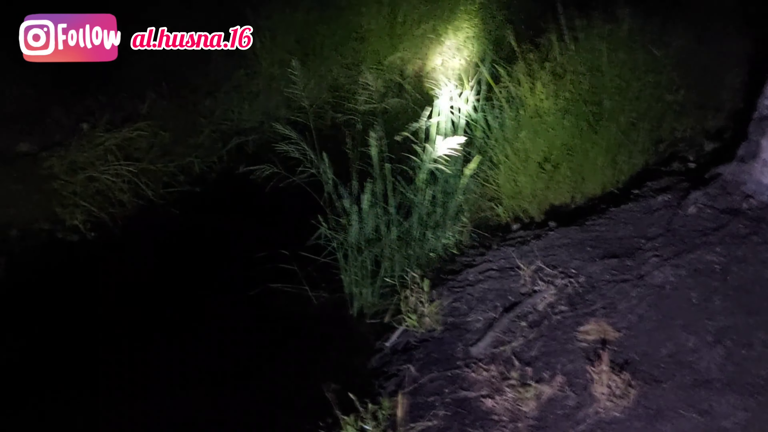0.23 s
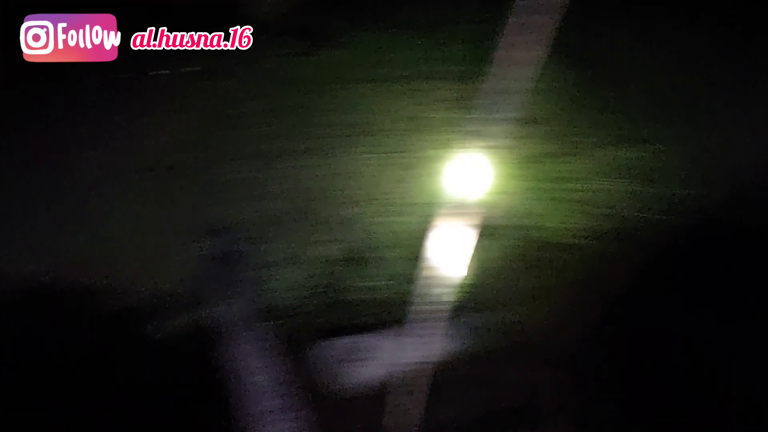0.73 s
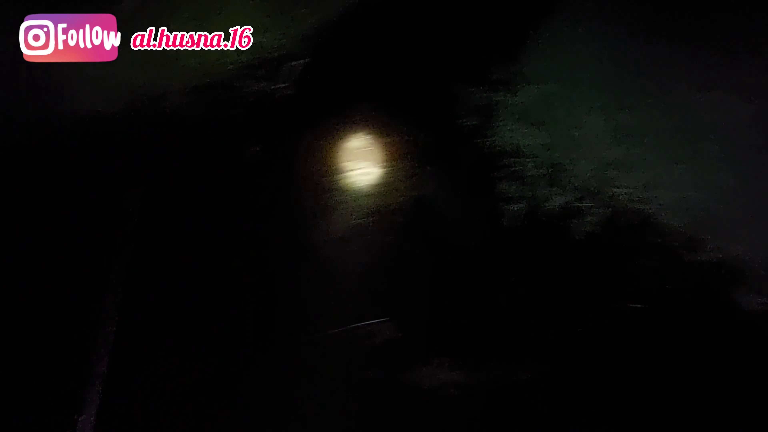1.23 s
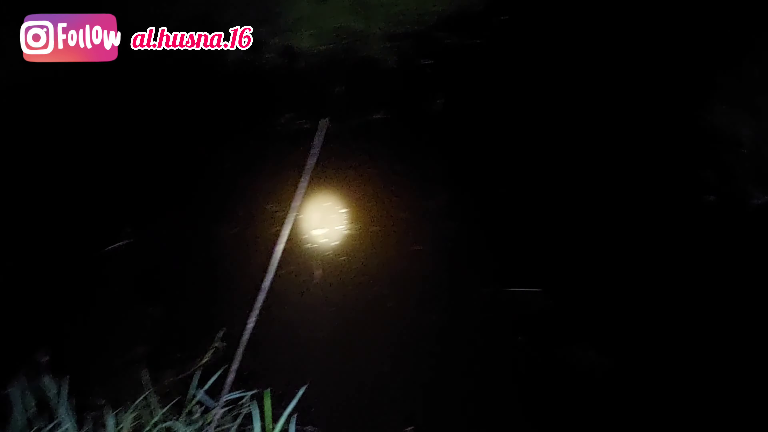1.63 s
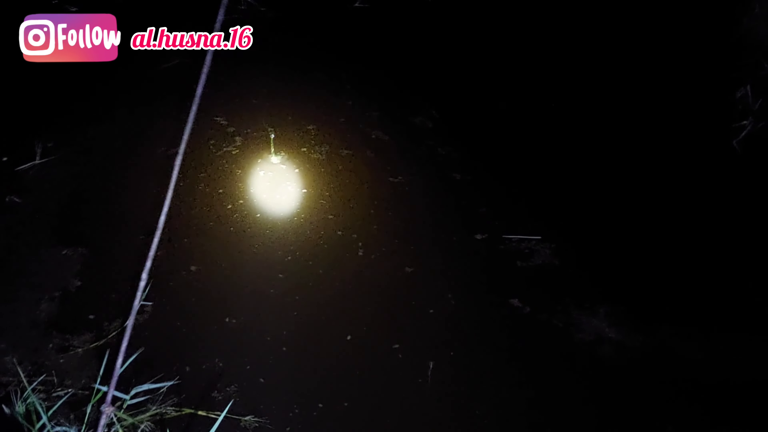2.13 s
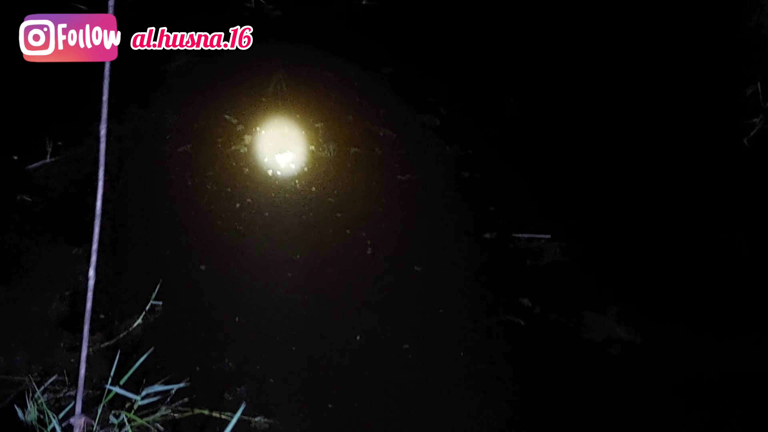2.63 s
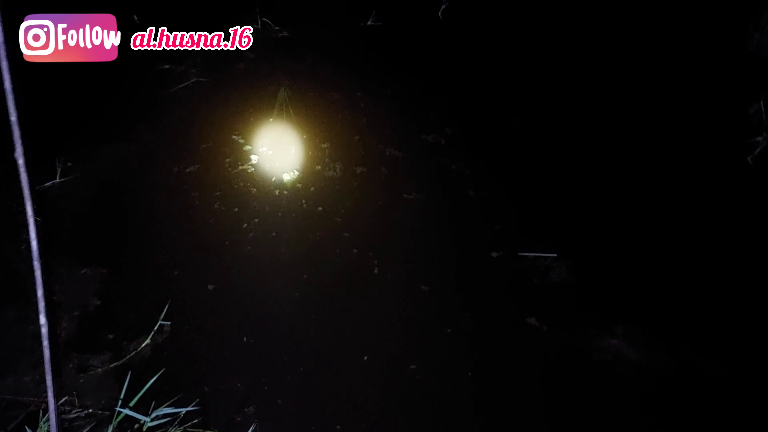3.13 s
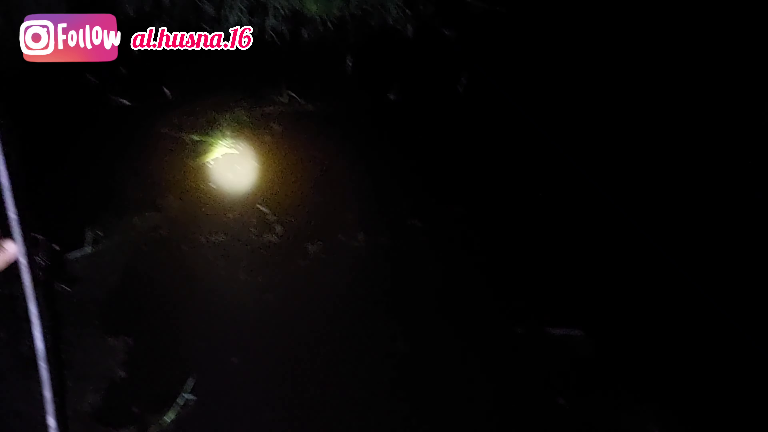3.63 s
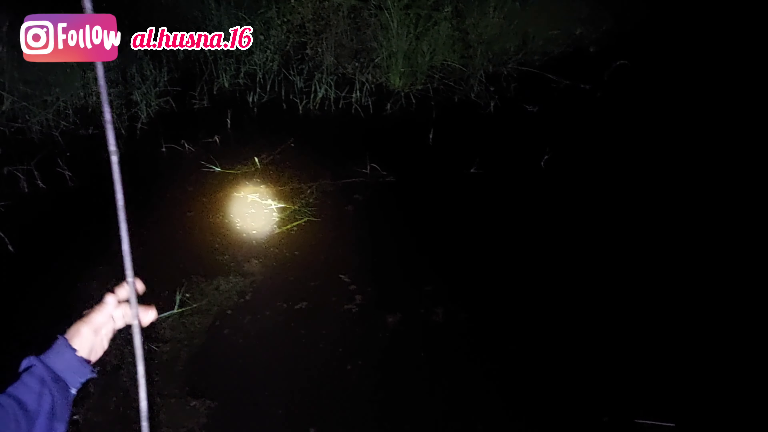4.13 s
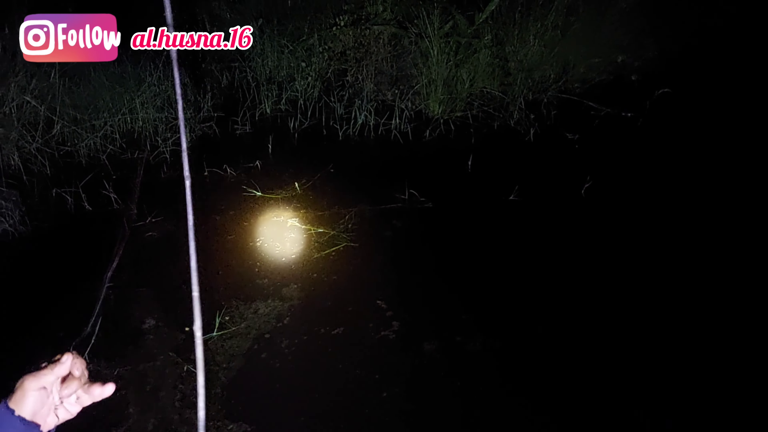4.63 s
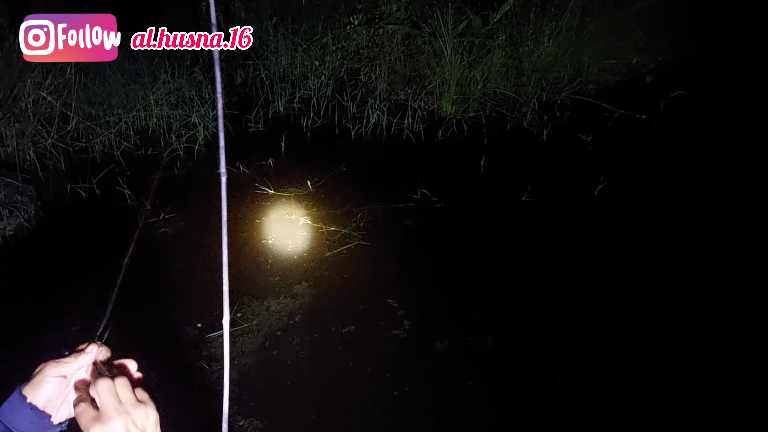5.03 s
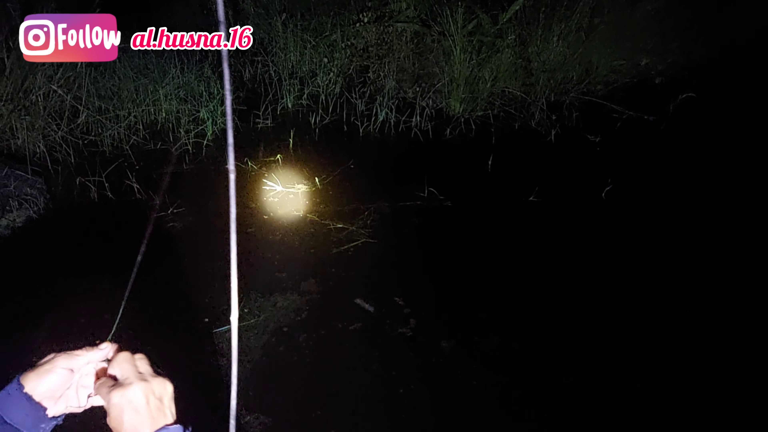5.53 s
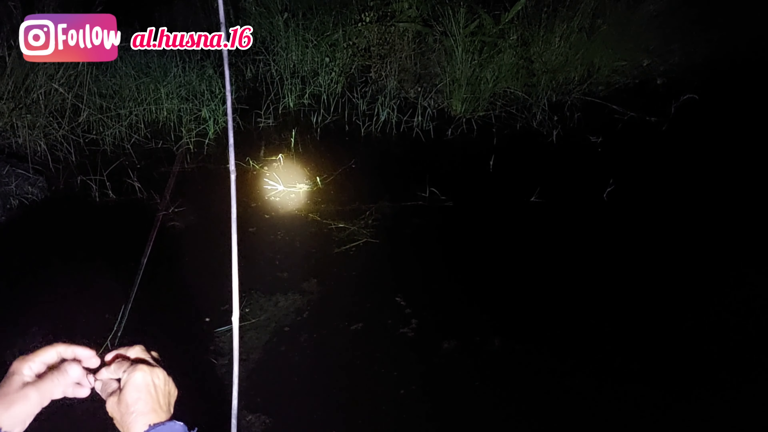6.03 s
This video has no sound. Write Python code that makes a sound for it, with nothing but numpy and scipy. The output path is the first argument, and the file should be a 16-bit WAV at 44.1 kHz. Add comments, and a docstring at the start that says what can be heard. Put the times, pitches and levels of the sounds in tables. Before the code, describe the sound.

Beside a pond at night, mole crickets trill continuously to the right over distant insect swarms. A cricket gives sharp double chirps in the first second, then another takes over with regular chirps as two frogs pipe quickly. A bush cricket adds a short, very high buzz a little more than once a second. Soft knocks and ticks come mostly early, over a faint far rumble and hiss, heard in stereo from a worn microphone.

```python
"""Night by a pond

Mole crickets trill to the right, among two chirping crickets, two piping frogs and three far swarms.
The insects stridulate: each wing stroke radiates a short gliding tone, and a bush cricket's click
train drives its wing resonances into a buzz. Soft knocks and ticks sound over far rumble and hiss. The
two microphone ports face apart: the left lies in the wearer's acoustic shadow and hears singers earlier.
The sound drops out briefly at 1.71 s, with a sharp click at each edge."""
import sys
import numpy as np
from scipy import signal
from scipy.io import wavfile
from scipy.ndimage import uniform_filter1d

SR = 44100
rng = np.random.default_rng(int(sys.argv[2]) if len(sys.argv) > 2 else 0)


def wav_record(signal):
    """Record a signal, one row per channel, as 16-bit PCM in the file named by sys.argv[1]."""
    frames = np.transpose(np.atleast_2d(signal))
    bounded = np.clip(frames, -1, 1)
    # unit amplitude maps onto the largest positive 16-bit level
    quanta = np.round(bounded * 32767).astype(np.int16)
    wavfile.write(sys.argv[1], SR, quanta)


N = 276507
T = np.arange(N) / SR


def amp(db):
    """Amplitude ratio of a level in decibels."""
    return 10 ** (np.asarray(db) / 20)


def unit_rms(x):
    """Normalisation to unit mean power."""
    return x / np.sqrt(np.mean(x ** 2) + 1e-20)


def curves(rows):
    """Linear interpolation in time: each column of a table, one value a sample."""
    times, *columns = np.transpose(rows)
    return [np.interp(T, times, column) for column in columns]


def spectrum_at(points, hz):
    """Interpolation on a logarithmic frequency axis."""
    freqs, values = np.transpose(points)
    return np.interp(np.log(hz + 1), np.log(freqs + 1), values)


def drift(hz):
    """Random fluctuation: noise of unit rms, low-passed at hz."""
    return unit_rms(signal.sosfilt(signal.butter(2, hz, fs=SR, output="sos"), rng.standard_normal(N)))


def resonate(x, hz, width_hz):
    """Damped resonance by heterodyning: shift hz down to zero, smooth, shift back."""
    carrier = np.exp(2j * np.pi * np.cumsum(np.full(len(x), hz)) / SR)
    pole = np.exp(-np.pi * width_hz / SR)
    return 2 * (carrier * signal.lfilter([1 - pole], [1, -pole], x / carrier)).real


def add(mix, start_s, sound):
    """Superposition of a sound on the mix, from start_s on."""
    at = round(start_s * SR)
    sound = sound[..., max(-at, 0):]
    part = mix[..., max(at, 0):][..., :sound.shape[-1]]
    part += sound[..., :part.shape[-1]]


def stroke(hz, glide_hz, length_s):
    """Linear frequency sweep: a wing stroke or pip is a soft-edged tone gliding through hz."""
    u = np.arange(0, length_s, 1 / SR) / length_s
    cycles = length_s * (hz * u + glide_hz * (u ** 2 - u) / 2)
    return np.sin(np.pi * u) ** 0.52 * np.sin(2 * np.pi * cycles)


def scatter(x, t60, delay_s):
    """Diffuse reflection off reeds and banks: exponentially decaying echoes, independent at each port."""
    t = np.arange(0, t60, 1 / SR)
    taps = rng.standard_normal((2, len(t))) * amp(-60 * t / t60) * (t > delay_s)
    return signal.oaconvolve(x[None], taps / np.linalg.norm(taps[0]), axes=1)[:, :len(x)]


def ports(x, pan_db, wet, t60=.25, left_lead_s=.00041):
    """Acoustic shadow: the left port gets more scattered sound, and leads. Pan is left minus right."""
    scattered_share = np.clip([[0.56 + 3.7 * wet], [wet]], 0, 1)
    direct = np.array([np.roll(x, -round(left_lead_s * SR)), x])
    both = np.sqrt(1 - scattered_share) * direct + np.sqrt(scattered_share) * scatter(x, t60, 0.0022)
    left = amp(pan_db) * np.ones(len(x))
    return 2 * both * np.array([left, np.ones(len(x))]) / np.sqrt(1 + left ** 2)


# Shadow of the wearer on ambient noise: (frequency [Hz], pan [dB])
SHADOW = [(60, -1), (130, 5), (290, 6), (640, 1.5), (1300, 2), (1800, -12.5), (3100, -25), (4300, -6.5),
          (6500, -15), (9000, -0.5), (12000, -12), (15000, -13)]
# Likeness of the two ports: (frequency [Hz], correlation [0-1])
COHERENCE = [(60, 0.85), (180, 0.67), (550, 0.31), (680, 0.01), (15000, 0.01)]

def diffuse_noise(spectrum, size, patchy_db=2.5):
    """Diffuse field: shaped noise with drifting spectral patches, partly coherent at the two ports."""
    frames, hz = 4 * N // size + 5, np.fft.rfftfreq(size, 1 / SR)
    a, b, c, d, patches = rng.standard_normal((frames, len(hz), 5)).T
    patches = unit_rms(uniform_filter1d(uniform_filter1d(patches, size=6, axis=0), size=8, axis=1))
    coherence = spectrum_at(COHERENCE, hz)[:, None]
    right = a + 1j * b
    left = coherence * right + np.sqrt(1 - coherence ** 2) * (c + 1j * d)
    left *= amp(spectrum_at(SHADOW, hz))[:, None]
    skirted = [(0, -90), (spectrum[0][0] * .7, -60), *spectrum, (spectrum[-1][0] * 1.3, -80)]
    spectra = np.array([left, right]) * amp(spectrum_at(skirted, hz)[:, None] + patchy_db * patches)
    both = signal.istft(spectra, nperseg=size, noverlap=3 * size // 4)[1][:, :N]
    return both / np.sqrt(np.mean(both.mean(0) ** 2))


# Far machine tones: (frequency [Hz], rms wander [Hz], level [dB], start [s], end [s])
MACHINE_TONES = [(54.4, 4, -59.5, -1.5, 7), (67, 5.05, -66, -2, 7), (131, 4.05, -61, 2, 6.7),
                 (171.5, 5.03, -61.5, 4, 6.1), (235, 4.6, -67.5, 1.3, 3.67)]

def machine_drone():
    """Random amplitude and frequency modulation: far machine tones waver as they come and go."""
    drone = 0
    for hz, wander_hz, db, start, end in MACHINE_TONES:
        tone = np.sin(2 * np.pi * np.cumsum(hz + wander_hz * drift(2.354)) / SR)
        fade = np.clip(np.minimum(T - start, end - T) / 0.18, 0, 1)
        drone += tone * fade * amp(db + 4.4 * drift(4.45))
    return drone * amp([[1.5], [-1.5]])


# Spectra of the far rumble and of far insects: (frequency [Hz], relative spectral density [dB])
RUMBLE_SPECTRUM = [(12, -38), (20, -23), (49, 1.5), (75, 2.5), (152, -8), (237, -16), (430, -27),
                   (547, -25.5), (1010, -35.5), (1410, -34.5), (1700, -24), (2210, -47), (3740, -120)]
HISS_SPECTRUM = [(1550, -19.5), (1800, -2.5), (2000, 2.5), (2650, 7), (3000, -4.5), (3450, -9.5),
                 (4300, -7.5), (5050, -11.5), (6500, -1.5), (8200, -2.5), (10600, -14.5), (12500, -6),
                 (15500, -18)]
# Swell of the rumble: (time [s], level [dB])
RUMBLE_LEVEL = [(0.0, -54), (0.42, -50), (0.55, -52), (2.2, -54.5), (2.8, -53), (6.27, -53.5)]

def rumble_and_hiss():
    """Ambient noise: far rumble and the hiss of countless insects arrive as diffuse fields."""
    swell = amp(curves(RUMBLE_LEVEL)[0] + 0.93 * drift(3.8))
    rumble = swell * diffuse_noise(RUMBLE_SPECTRUM, size=4096)
    return rumble + amp(-50.5) * diffuse_noise(HISS_SPECTRUM, size=2048)


def swarm(hz, spread_hz, glide_hz, stroke_s, per_s, spread_db):
    """Incoherent summation: fifteen singers, each at its own pitch, stroke at random moments."""
    out = np.zeros(N)
    for detune in np.linspace(-1.7, 1.7, 15):
        onsets = (rng.random(N) < per_s / 15 / SR) * amp(spread_db * rng.standard_normal(N))
        tone = stroke(hz + detune * spread_hz, glide_hz, stroke_s)
        out += np.exp(-detune ** 2 / 4) * signal.oaconvolve(onsets, tone)[:N]
    return unit_rms(out)


# Far chorus: (time [s], low band level [dB], middle re low [dB], high re low [dB], pan [dB])
FAR_LEVELS = [(0, -49, 0.5, -5.5, -5), (.6, -47.5, -0.5, -7, -6.5), (1.1, -51.5, 3.5, -3.5, -6.5),
              (1.7, -52, 1, -2, -6), (3, -51.5, 1.5, -1, -6), (4.5, -49.5, -1, -3.5, -5.5),
              (6.27, -49.5, -1.5, -3, -6)]
# One species a band: (pitch [Hz], spread [Hz], glide [Hz], stroke length [s], added pan [dB],
# modulation depth [0-1], modulation rate [Hz])
FAR_SPECIES = [(5844, 216, -400, .012, -5.5, 0.033, 63), (7268, 247, -300, .008, -4, 0.13, 190),
               (9310, 394, -200, 0.0034, 3, 0.25, 160)]
# Blur of far field crickets: (time [s], level [dB])
HAZE_LEVEL = [(0, -72), (.7, -62), (1.3, -64), (1.7, -76), (1.72, -67), (6.27, -78)]

def far_crickets():
    """Amplitude modulation: three dense swarms each share a faint pulse, over a fading haze."""
    low_db, middle_db, high_db, pan_db = curves(FAR_LEVELS)
    out = 0
    for band_db, species in zip((0, middle_db, high_db), FAR_SPECIES):
        hz, spread_hz, glide_hz, stroke_s, added_pan_db, depth, pulse_hz = species
        pulse = 1 + depth * np.cos(2 * np.pi * np.cumsum(pulse_hz + 1.5 * drift(3.0)) / SR)
        song = pulse * swarm(hz, spread_hz, glide_hz, stroke_s, per_s=14 / stroke_s, spread_db=1.9)
        song *= amp(low_db + band_db + 0.11 * drift(6.5))
        out += ports(song, pan_db + added_pan_db, wet=0.12)
    haze = swarm(4350, spread_hz=148, glide_hz=-700, stroke_s=0.0159, per_s=450, spread_db=2.2)
    return out + ports(amp(curves(HAZE_LEVEL)[0]) * haze, pan_db=-5, wet=0.11)


# Knocks and clicks: (time [s], peak level before panning [dB], resonance [Hz], bandwidth [Hz], pan [dB])
KNOCKS = [(0.054, -54, 1250, 810, 4), (0.0758, -25, 12400, 2500, -16), (.33, -49.5, 283, 61, 5),
          (0.369, -60, 265, 60, 1), (.518, -58, 775, 400, -2), (0.571, -50, 1220, 900, -4),
          (.6, -54, 1003, 1000, -4), (.769, -45.5, 3170, 350, -14), (1.04, -59, 1310, 1400, 0),
          (1.194, -51, 1622, 700, 0), (1.279, -47, 1800, 400, 1), (1.288, -49, 400, 300, 4),
          (1.305, -39.5, 2770, 599, -14), (1.304, -55, 1100, 900, 5), (1.474, -49, 12500, 2476, -12),
          (1.7082, -41, 900, 2950, -16), (1.721, -42, 900, 3000, -7), (1.866, -49, 1350, 799, -6),
          (3.426, -43, 15000, 901.6, -12), (3.436, -38, 3700, 1000, -13), (3.44, -43, 1950, 450, -9),
          (5.768, -43.5, 2050, 450, -11), (5.77, -44, 3400, 1192, -13)]

def knocks_and_clicks():
    """Damped resonances struck by noise: soft knocks and ticks, and a click at each dropout edge."""
    out, t = np.zeros((2, N)), np.arange(0, .08, 1 / SR)
    for start, db, hz, width, pan_db in KNOCKS:
        burst_s = 18 / (width + hz / 2) / (1 + (width / 2200) ** 4)  # dull knocks drag longer
        envelope = np.minimum(3.7 * t / burst_s, 1) * np.exp(-t / burst_s)
        burst = 0.22 * (t == 0) + envelope * rng.standard_normal(len(t))
        ring = resonate(resonate(burst, hz, width), hz, 1.7 * width)
        add(out, start, ring / abs(ring).max() * amp([[db + pan_db / 2], [db - pan_db / 2]]))
    return out


# Pace of each frog: (time [s], pips so far [count])
SLOW_FROG = [(0.08, 0), (1.59, 14), (1.7213, 15), (1.93, 17), (2.059, 18), (2.704, 24), (3.4444, 31),
             (4.6263, 42), (6.269, 57)]
QUICK_FROG = [(0.02, 0), (1.727, 18), (2.2037, 23), (2.579, 27), (3.5392, 37), (5.3464, 56), (6.2176, 65)]
# Mean strength of the pips: (time [s], level [dB])
FROG_LEVEL = [(0, -53), (1.69, -59), (1.72, -46.5), (6.27, -46.5)]

def frogs():
    """Tone-burst trains: two frogs pipe about ten times a second, varying in pitch and level."""
    song = np.zeros(N)
    for pace in (SLOW_FROG, QUICK_FROG):
        times, counts = np.transpose(pace)
        for start in np.interp(np.arange(counts[-1] + 1), counts, times):
            hz = rng.normal(2795, 25)
            db = rng.normal(np.interp(start, *np.transpose(FROG_LEVEL)), 1.8)
            add(song, start - .002, amp(db) * stroke(hz, glide_hz=-67, length_s=0.013))
    return ports(song, pan_db=-19, wet=0.066)


# Runs of chirps: (start [s], end [s], spacing [s], first level [dB], last level [dB])
CHIRP_RUNS = [(1.136, 1.83, 0.19, -61, -50), (1.689, 2.48, 0.21, -49, -49.5), (2.538, 5.7, .2073, -49, -45),
              (5.869, 6.2, 0.21, -46.5, -46.5)]
# The six wing strokes of a chirp: (relative level [dB])
STROKE_LEVELS = [-2, 0.5, 2, 2.6, 3, 2.8]

def field_cricket(stroke_gap_s=.0187):
    """Stridulation: six falling wing strokes, slightly uneven, make each regularly spaced chirp."""
    song = np.zeros(N)
    tone = stroke(4175, glide_hz=-980, length_s=0.01662)
    for first, end, spacing, first_db, last_db in CHIRP_RUNS:
        starts = np.arange(first, end, spacing)
        for start, db in zip(starts, np.linspace(first_db, last_db, len(starts))):
            jitter = rng.standard_normal(6)
            for k, stroke_db in enumerate(STROKE_LEVELS):
                onset = start + k * stroke_gap_s + 0.00026 * jitter[k]
                add(song, onset, amp(db + stroke_db + 1.2 * jitter[k - 1]) * tone)
    song[(T >= 1.68) & (T <= 1.7206)] = 0  # one chirp lacks its first strokes
    return ports(song, pan_db=-14.5, wet=0.08)


# Double chirps: (time [s], level of the second stroke [dB])
DOUBLE_CHIRPS = [(-.005, -43), (.084, -36), (0.221, -37.5), (0.369, -36), (0.517, -33.5), (0.672, -36),
                 (0.844, -38.5)]

def second_cricket():
    """Stridulation in pairs: a short falling stroke, then a longer, lower and louder one."""
    song = np.zeros(N)
    for start, db in DOUBLE_CHIRPS:
        add(song, start, amp(db - 2) * stroke(6050, glide_hz=-600, length_s=0.0213))
        add(song, start + 0.03, amp(db) * stroke(5910, glide_hz=-900, length_s=0.028))
    return ports(song, pan_db=-22, wet=0.026)


# Buzzes: (end [s], final level [dB], click rate [Hz], pan [dB], echo send [dB], tilt [dB/kHz])
BUZZES = [(0.031, -44, 450, -11, -5.5, 0), (0.91, -33.5, 336, -9, -15, -.3),
          (1.759, -44.5, 383, -2, -39.5, -1), (2.492, -44.5, 340, -3, -2.5, -3.5),
          (3.4, -46.5, 335, -4, -3.5, -1), (4.23, -42.5, 364, -6, -5, -4), (5.164, -43, 360, -4, -7, -1),
          (6.108, -46.5, 353, -2, 0.5, -4)]
# Wing resonances: (frequency [Hz], bandwidth [Hz], relative level [dB])
WING_MODES = [(10850, 450, -11), (11270, 530, 6), (11850, 400, -1.5), (12700, 640, -4.5), (13800, 700, -21),
              (15500, 700, -19)]

def bush_cricket(buzz_s=.105, cut_s=1.709, bank_delay_s=.068):
    """Forced resonance: clicks ring the wings; a buzz swells, stops dead and echoes off the far bank."""
    out, t = np.zeros((2, N)), np.arange(0, buzz_s + .3, 1 / SR)
    for end, db, click_hz, pan_db, echo_db, tilt_db in BUZZES:
        start = end - buzz_s
        sounding = (t < buzz_s) & ~((start < cut_s) & (start + t > cut_s))  # the dropout cuts one short
        clock_s = t - buzz_s + .002  # zero at the last click of a full buzz
        cycles = click_hz * clock_s * (1 - .003 * (clock_s / buzz_s + .5))  # the click rate sags slightly
        clicks = sum(np.cos(2 * np.pi * k * cycles) for k in range(22, 46))
        clicks *= sounding * amp(-34 * np.clip(1 - t / .058, 0, 1) ** 1.47)
        ring = 0
        for hz, width, mode_db in WING_MODES:
            sway_db = 3 * np.cos(2 * np.pi * (t / .11 + rng.random()))  # the modes trade strength
            mode = resonate(resonate(clicks, hz, width), hz, 2 * width) / width
            ring += amp(mode_db + sway_db + tilt_db * (hz - 11200) / 1000) * mode
        ring *= amp(db) / np.sqrt(np.mean(ring[sounding][-800:] ** 2))
        diffuse = scatter(ring, t60=0.34, delay_s=0.0073)
        bank = amp(-9) * scatter(np.roll(ring, round(bank_delay_s * SR)), t60=.02, delay_s=0)
        echo = amp(echo_db) * (diffuse + bank) * amp([[pan_db], [6]])
        add(out, start, ports(ring, pan_db, wet=0.056, t60=.008) + echo)
    return out


# Near trill as the wearer turns: (time [s], level [dB], pan [dB], lead singer's pitch [Hz])
TRILL = [(0.0, -31.5, -17, 2360), (0.35, -34, -17, 2355), (0.68, -32.5, -17, 2340),
         (0.74, -36.5, -17, 2347), (1.12, -30, -14, 2307), (1.33, -40.5, -12, 2319), (1.43, -37, -13, 2340),
         (1.75, -37, -15, 2335), (2.06, -34.5, -15.5, 2364), (2.6, -35.5, -16.5, 2365),
         (4.7, -38, -12.5, 2360), (6.27, -34.5, -13.5, 2286)]
# Two near singers: (time [s], steady pulser's level [dB], lead singer re trill level [dB])
SINGER_LEVELS = [(0, -43.5, -8.5), (.9, -46.5, -3.5), (1.7, -41, -1), (2, -42.5, -1), (3.3, -42, -1),
                 (4.3, -41, -5.5), (6.27, -40.5, -10.5)]
# Pace of the pulser: (time [s], pulse rate [Hz])
PULSE_RATE = [(0, 152.8), (1.7, 152.8), (1.72, 153.8), (6.27, 153.6)]
# Its partials: (multiple of the pulse rate [1], relative level [dB])
PULSER_PARTIALS = [(13, -18), (14, 2), (15, 1), (16, -0.5), (17, -14)]
# Its thin low tone on the 12th multiple: (time [s], level [dB])
LOW_TONE_LEVEL = [(0, -64), (1.7, -66), (1.85, -60.5), (3.5, -59.5), (4.2, -66.5), (5.2, -64.5),
                  (6.27, -65.5)]

def mole_crickets():
    """Modulation sidebands: pulsed wing tones of a wavering lead singer and a pulser, over a crowd."""
    trill_db, pan_db, lead_hz = curves(TRILL)
    pulser_db, lead_db = curves(SINGER_LEVELS)
    tremolo = 1 + 0.26 * np.cos(2 * np.pi * np.cumsum(142 + 2.66 * drift(4.7)) / SR)
    lead = unit_rms(tremolo * np.sin(2 * np.pi * np.cumsum(lead_hz + 42 * drift(70)) / SR))
    crowd = swarm(2306, spread_hz=113, glide_hz=-72, stroke_s=.014, per_s=2500, spread_db=2.7)
    cycles = np.cumsum(curves(PULSE_RATE)[0] + 0.4064 * drift(6.38)) / SR
    slip = np.cumsum(30 * drift(49.6)) / SR  # the wing tone slips against the pulse clock
    # quadratic phase: the tone slides inside each pulse, so the partials peak one after another
    pulser = sum(amp(db) * np.cos(2 * np.pi * (k * cycles + slip) + 0.58 * (k - 15) ** 2)
                 for k, db in PULSER_PARTIALS)
    near = amp(trill_db) * (amp(lead_db) * lead + amp(-10) * crowd) + amp(pulser_db) * unit_rms(pulser)
    low_db = curves(LOW_TONE_LEVEL)[0] + 1.5 * drift(7.2)
    low_tone = amp(low_db) * np.cos(2 * np.pi * (12 * cycles + 0.395 * slip))
    return ports(near, pan_db, wet=0.019, t60=0.098) + ports(low_tone, pan_db=-6, wet=0.088)


def scene():
    """Linear superposition of all sources at the two ports."""
    singers = mole_crickets() + far_crickets() + field_cricket() + second_cricket() + frogs()
    return singers + bush_cricket() + knocks_and_clicks() + machine_drone() + rumble_and_hiss()


# Brief dropout: (time [s], gain [0-1])
DROPOUT = [(1.7088, 1), (1.7089, .45), (1.712, .4), (1.7122, .06), (1.7205, .55), (1.7206, 1)]

def record(dry, bass_cut_hz=42, band_limit_hz=15720):
    """Band limiting: the microphone's bass cut, a brief dropout, then a steep low-pass."""
    high_passed = signal.sosfilt(signal.butter(3, bass_cut_hz, "high", fs=SR, output="sos"), dry)
    low_pass = signal.firwin(511, band_limit_hz, window=("kaiser", 9), fs=SR)
    return signal.oaconvolve(high_passed * curves(DROPOUT)[0], low_pass[None], "same")


dry = scene()
out = record(dry)
wav_record(out)
```